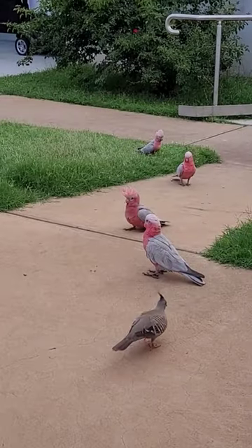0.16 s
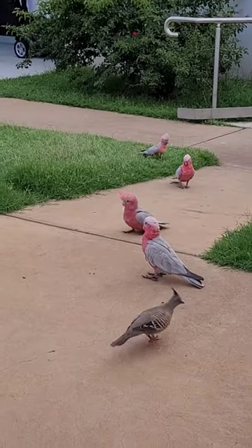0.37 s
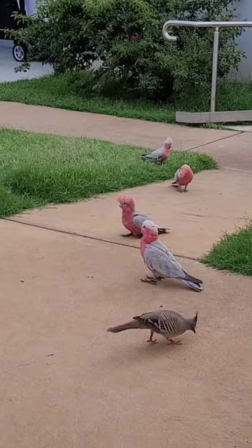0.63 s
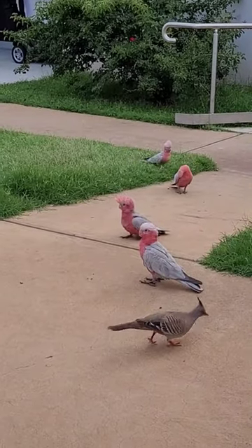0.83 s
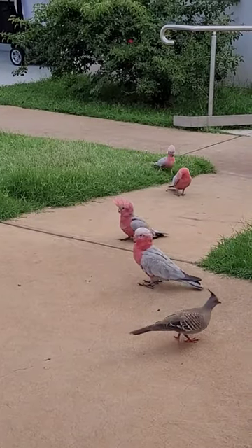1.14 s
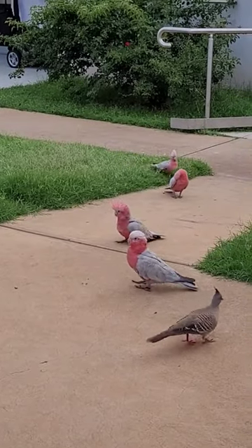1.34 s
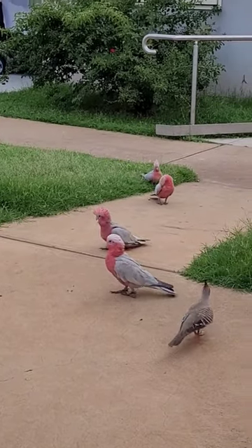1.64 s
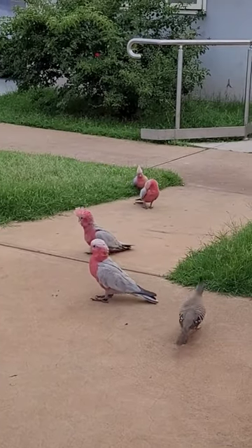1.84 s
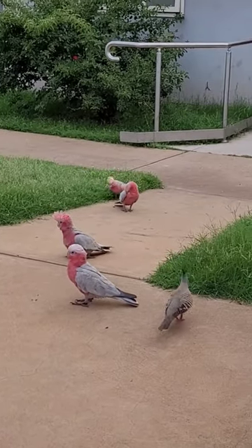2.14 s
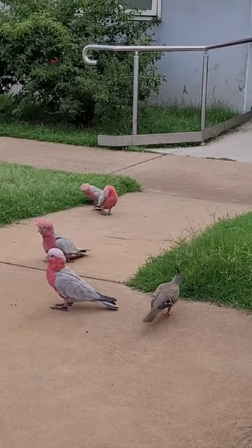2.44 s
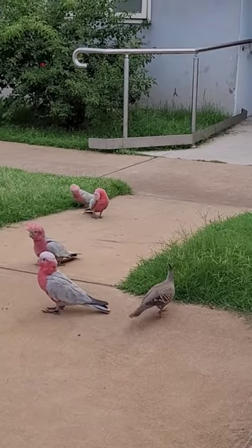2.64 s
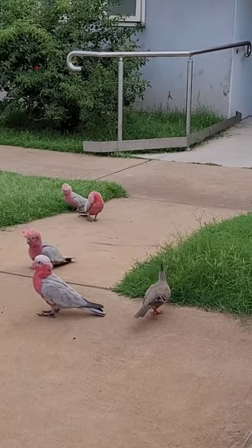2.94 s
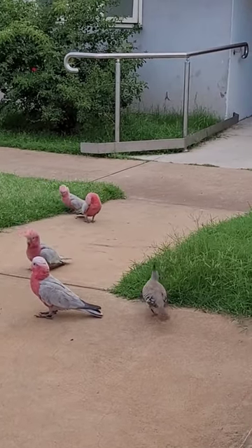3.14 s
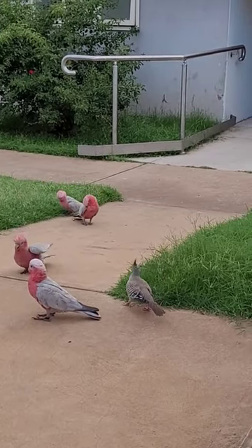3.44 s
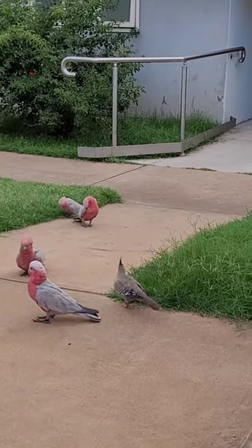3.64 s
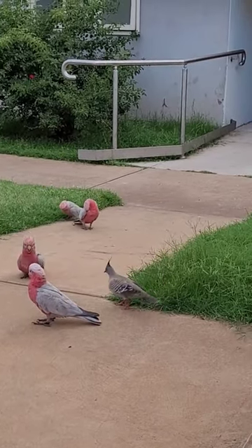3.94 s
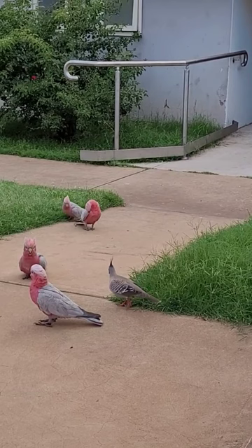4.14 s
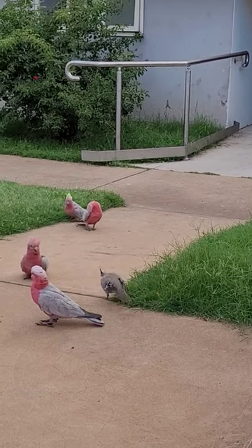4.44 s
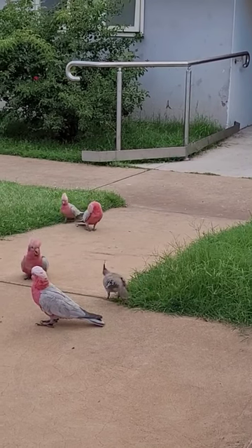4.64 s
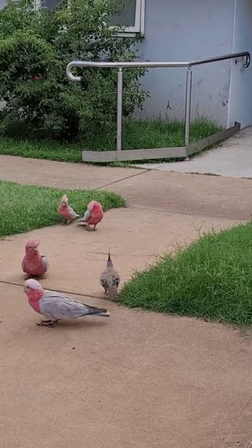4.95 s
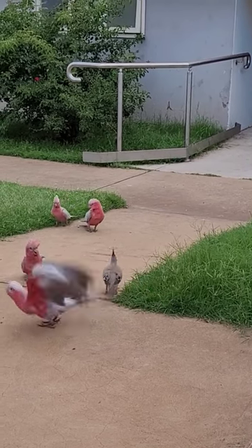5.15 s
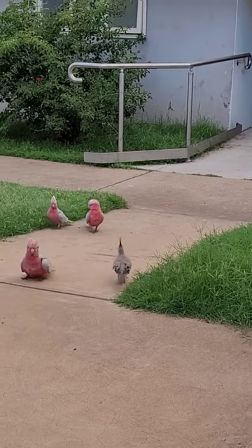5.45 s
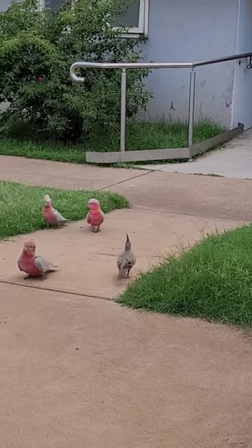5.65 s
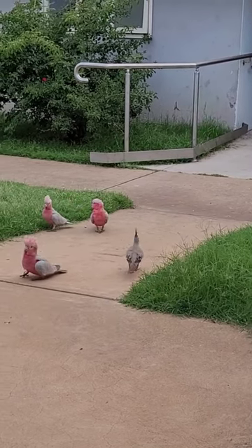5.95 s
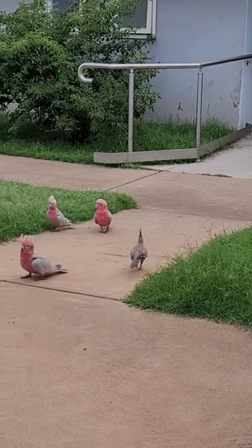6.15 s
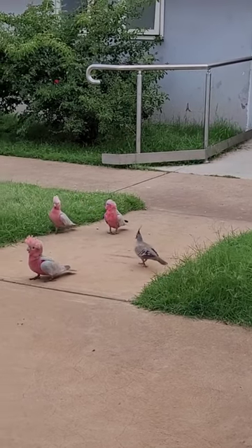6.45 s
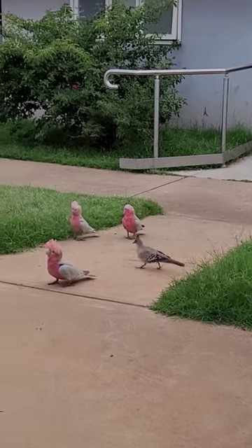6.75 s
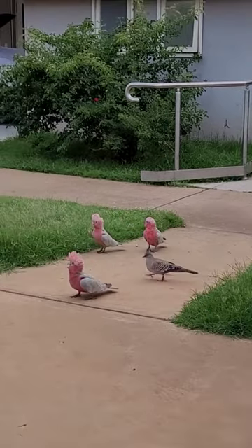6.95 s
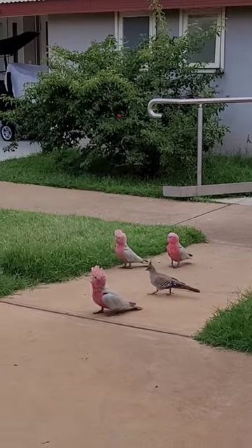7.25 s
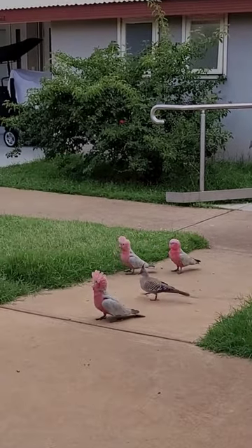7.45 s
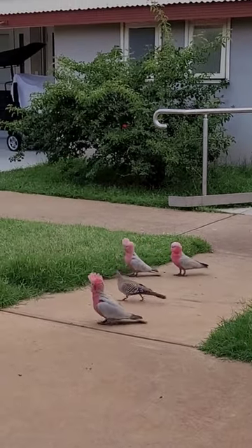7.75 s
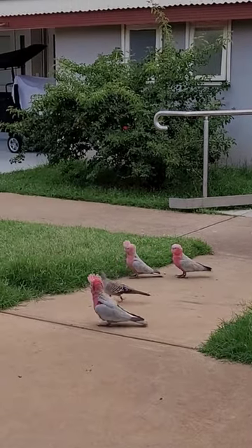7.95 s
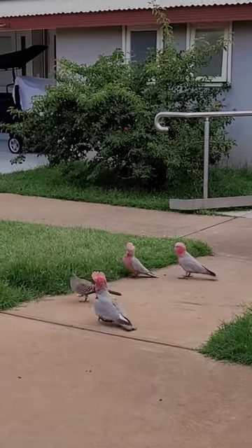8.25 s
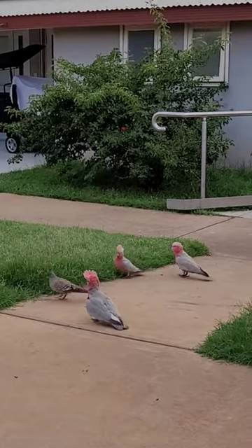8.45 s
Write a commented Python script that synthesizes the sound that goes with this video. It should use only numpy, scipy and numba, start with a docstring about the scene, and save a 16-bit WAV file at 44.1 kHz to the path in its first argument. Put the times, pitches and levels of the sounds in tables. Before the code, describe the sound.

A nearby cockatoo screeches in short high calls while others whistle and a young one wheezes and chatters, with light wind.

```python
"""A paved path between houses, with a flock of cockatoos a few metres away.
A near bird gives sharp "cheet" calls, whistles that a pulsing membrane breaks into a rasp. Others
whistle mostly falling notes; a young one wheezes, chatters and screeches through its throat resonances.
Paving and walls reflect the calls over distant traffic, a steady whine and a little wind on the
two microphone ports."""
import sys
import numpy as np
from scipy import signal
from scipy.fft import rfft, irfft
from scipy.io import wavfile
from scipy.ndimage import uniform_filter1d, minimum_filter1d
from numba import njit

SR = 44100
rng = np.random.default_rng(int(sys.argv[2]) if len(sys.argv) > 2 else 0)


def waveform_to_disk(signal):
    """Save audio, clipped to [-1, 1], as 16-bit WAV at the path in sys.argv[1]."""
    frames = np.transpose(np.atleast_2d(signal))
    scaled = np.clip(frames, -1, 1) * 32767
    samples = np.round(scaled).astype(np.int16)
    wavfile.write(sys.argv[1], SR, samples)


N = 379260
TIME = np.arange(N) / SR

# Near bird's calls: start_s, clean_s, rasping_s, first_hz, held_hz,
# whistle_db, octave_db, rasp_db, croak_db
CHEETS = [ (0.125, 0.021, .23, 3697, 3790, -27, -40.5, -19.5, -45.5),
          (0.863, 0.021, 0.13, 3444, 3712, -17.5, -25.5, -15.5, -28.5),
          (1.082, 0.033, 0.11, 3420, 3656, -19, -23, -17, -28.5),
          (1.31, 0.042, 0.11, 3533, 3670, -21, -24.5, -16.5, -29.5),
          (1.835, .02, 0.096, 3794, 3663, -28.5, -35.5, -41, -50.5),
          (2.36, 0.043, .10, 3424, 3665, -22, -23.5, -15, -29),
          (4.315, 0.021, .11, 3874, 3635, -27.5, -40, -31, -48),
          (5.185, 0.021, .12, 3444, 3690, -23.5, -28.5, -16.5, -28),
          (5.39, .05, .10, 3520, 3704, -22, -24, -18, -30.5),
          (5.692, .036, .11, 3467, 3669, -21, -24.5, -17.5, -30.5),
          (5.972, 0.045, 0.1, 3426, 3650, -21.5, -23, -18.5, -32),
          (7.69, 0.031, .11, 3326, 3650, -21.5, -23.5, -16.5, -27),
          (7.9, 0.041, .12, 3542, 3698, -21, -23.5, -16.5, -28)]
# Its throat resonances in the rasp and in the croak: centre_hz, width_hz, gain_db
RASP_FORMANTS = [(3090, 690, -9), (4455, 500, -1), (5510, 470, 3), (6520, 740, -13.5), (7960, 550, -14.5),
                 (10000, 830, -9)]
CROAK_FORMANTS = [(695, 600, -0.5), (1560, 83, -5), (2356, 350, 0.5), (2996, 130, 4.5)]


def cheets():
    """Subharmonic locking: a membrane at 1/5 of a whistle's frequency rasps over it, then croaks."""
    scoop_hz_per_s, sag_db_per_s, croak_s = 8900, 145, 0.0634
    out = np.zeros(N)
    for start, clean_s, rasping_s, first_hz, held_hz, db, octave_db, rasp_db, croak_db in CHEETS:
        span, t, gate = envelope(start, clean_s + rasping_s, attack_s=0.014, release_s=0.065)
        rasp_age = np.maximum(t - clean_s, 0)
        onset = np.clip(rasp_age / 0.0029, 0, 1)
        unsettled = np.exp(-(rasp_age / .025) ** 2)
        hz = held_hz + (first_hz - held_hz) * unsettled
        if first_hz < 3420:  # a low opening slides upward
            hz += scoop_hz_per_s * (np.minimum(t, clean_s) - clean_s / 2) * unsettled
        octave = octave_db - 13.5 * onset * np.exp(-(rasp_age / 0.042) ** 4)  # dips as the rasp begins
        upper_db = (db + octave) / 2
        whistle = harmonics(hz, [db, octave, upper_db - 11.5, upper_db - 21.5], hoarseness=0.153)
        # the rasp fades, catches just before the croak, then swells with it
        croak_progress = np.clip(1 + (rasp_age - rasping_s) / croak_s, 0, 1)
        catch_db = -7.5 * np.exp(-((rasp_age - rasping_s + croak_s) / 0.022) ** 2)
        swell_db = 6.5 * np.minimum(croak_progress / 0.45, 1)
        rasp_gain = undb(rasp_db - sag_db_per_s * rasp_age + catch_db + swell_db)
        rasp = onset * rasp_gain * voice(hz / 5, .1 * np.exp(-rasp_age / 0.088), RASP_FORMANTS)
        croak_hz = hz / 5 * (1 - .15 * croak_progress ** 2)
        croak_gain = np.clip(croak_progress / 0.54, .15, 1) * undb(croak_db)
        croak = onset * croak_gain * voice(croak_hz, 0.11, CROAK_FORMANTS)
        out[span] += gate * (whistle + rasp) + np.sqrt(gate) * croak
    return out


def harmonics(hz, levels_db, hoarseness):
    """Random modulation: tremor in frequency and amplitude broadens each line of a harmonic series."""
    count = len(hz)
    phase = 2 * np.pi * np.cumsum(hz * (1 + .007 * wander(150, count))) / SR
    lines = sum(undb(db + 2.5 * wander(89.6, count)) * np.sin(k * phase)
                for k, db in enumerate(levels_db, 1))
    return np.sqrt(2) * lines * (1 + hoarseness * wander(900, count))


def voice(hz, roughness, formants):
    """Source-filter model: membrane pulses and the breath they gate excite throat resonances."""
    count = len(hz)
    pulses = membrane_pulses(hz, np.full(count, roughness), rng.standard_normal((count // 20 + 2, 2)))
    breath = uniform_filter1d(pulses, size=24) * rng.standard_normal(count)
    source = unit_rms(pulses) + 0.73 * roughness * unit_rms(breath)
    rings = [undb(db) * resonance(source, centre, 2 * width, stages=2) for centre, width, db in formants]
    return unit_rms(sum((-1) ** k * ring for k, ring in enumerate(rings)))


@njit
def membrane_pulses(hz, roughness, scatter):
    """Jitter and shimmer: one pulse a cycle, with random scatter in its period and size."""
    pulses, phase, cycle = np.zeros(len(hz) + 1), 0., 0
    for i in range(len(hz)):
        step = hz[i] * np.exp(.5 * roughness[i] * scatter[cycle, 0]) / SR
        phase += step
        if phase >= 1:
            phase, cycle = phase - 1, cycle + 1
            size = np.exp(roughness[i] * scatter[cycle, 1])
            pulses[i] += size * phase / step
            pulses[i + 1] += size * (1 - phase / step)
    return pulses[:-1]


# Farther birds' notes: start_s, length_s, first_hz, last_hz, time_constant_s, level_db, octave_db
WHISTLES = [ (0.0, 0.055, 2348, 2290, 0.14, -35.5, -38.5), (0.055, 0.055, 2240, 2068, 0.13, -31.5, -35),
            (0.332, 0.096, 3000, 2922, 0.045, -35.5, -35), (0.747, .045, 2430, 2260, 0.021, -30, -34.5),
            (0.808, 0.053, 2365, 2395, .03, -31, -27), (0.868, 0.039, 3180, 2995, 0.04, -24, -23),
            (1.711, 0.047, 2785, 2490, 0.044, -42.5, -37.5), (1.919, 0.088, 2845, 2782, 0.13, -37, -33),
            (2.066, 0.14, 2426, 1860, 0.39, -42, -50), (2.326, 0.078, 2780, 2530, 0.041, -37, -26),
            (2.383, .135, 2686, 2282, 0.25, -39, -46), (3.531, .185, 2494, 1893, 0.34, -39, -42),
            (3.821, 0.1196, 2562, 2707, 0.033, -33.5, -22.5), (3.894, .1, 2650, 2350, .1, -36, -36),
            (4.408, 0.067, 2850, 2814, 0.088, -30.5, -30), (4.593, 0.046, 2997, 2645, 0.036, -32, -26),
            (4.665, 0.058, 2606, 2585, 0.028, -37.5, -34), (5.102, 0.061, 2080, 1844, .1, -57, -43.5),
            (5.169, 0.058, 2698, 2830, 0.0208, -29.5, -22), (5.2, .15, 2412, 2025, 0.198, -39, -32),
            (5.908, 0.12, 2990, 2703, 0.052, -41, -34.5), (6.299, 0.036, 2850, 2570, .03, -38.5, -33),
            (6.367, 0.064, 2380, 2476, 0.027, -48.5, -42.5), (6.75, 0.16, 2470, 1830, 0.24, -40, -43),
            (7.129, 0.13, 2535, 2263, 0.028, -38, -49), (7.76, 0.034, 2710, 2492, 0.033, -33.5, -24),
            (8.375, 0.042, 2325, 2185, 0.052, -56, -28.5), (8.439, 0.16, 2626, 1997, 0.014, -35, -64)]


def whistles():
    """Period doubling: gliding notes carry lines at odd multiples of half their frequency."""
    long_s = .132  # longer notes squawk, with stronger half-frequency lines
    out = np.zeros(N)
    for start, length, first_hz, last_hz, glide_s, db, octave_db in WHISTLES:
        span, t, gate = envelope(start, length, attack_s=0.24 * min(length, long_s), release_s=0.021)
        hz = first_hz + (last_hz - first_hz) * np.expm1(-t / glide_s) / np.expm1(-length / glide_s)
        half_db = -11.5 if length > long_s else -25.5
        levels_db = [db + half_db - 4.5, db, db + half_db, octave_db,
                     octave_db + half_db + 3.5, octave_db - 18, octave_db + half_db, octave_db - 24]
        out[span] += gate * harmonics(hz / 2, levels_db, hoarseness=0.29)
    return out


# Young bird's throat resonances: centre_hz, width_hz, gain_db
YOUNG_FORMANTS = [(648, 280, -18), (1900, 700, -11), (3436, 1160, -1), (4730, 750, 2), (5340, 1110, 2),
                  (10430, 3500, -10), (14300, 730, -19)]


def young_bird():
    """Aperiodic vibration: one hoarse voice feeds wheezes and chatter; a screech joins them."""
    hoarse = voice(np.full(N, 680.), roughness=.5, formants=YOUNG_FORMANTS)
    return wheezes(hoarse) + chatter(hoarse) + screech()


# Begging breaths: start_s, length_s, first_db, last_db, windpipe_hz, windpipe_db
WHEEZES = [ (0.0, .4, -35, -35.5, 1420, -55), (0.361, 0.58, -47.5, -30.5, 1477, -48.5),
           (1.498, 0.52, -54, -37.5, 1340, -55), (2.003, 0.39, -39.5, -46, 1474, -54.5),
           (3.548, 1.16, -41, -42, 1381, -46.5), (4.679, 0.545, -45.5, -37.5, 1457, -52.5),
           (6.202, 0.77, -62, -37, 1490, -61.5), (7.116, 0.49, -28.5, -28.5, 1364, -45),
           (7.561, 0.24, -43, -36, 1480, -52), (8.223, .44, -49.5, -36.5, 1450, -58.5)]
# Mouth resonances, breathing in and out: centre_hz, width_hz, gain_db
MOUTH_IN = [(3900, 500, 4), (5170, 600, 2.3)]
MOUTH_OUT = [(4230, 770, 2.9), (5910, 960, 0.48)]


def wheezes(hoarse):
    """Cavity resonance: the mouth colours the hoarse voice while breath noise rings the windpipe."""
    out = np.zeros(N)
    for start, length, first_db, last_db, pipe_hz, pipe_db in WHEEZES:
        span, t, gate = envelope(start, length, attack_s=0.052, release_s=0.079)
        ring_hz = pipe_hz * (1 + 0.029 * wander(6.5, len(t)))
        pipe = resonance(rng.standard_normal(len(t)), ring_hz, width_hz=100, stages=2)
        mouth = MOUTH_IN if pipe_hz > 1400 else MOUTH_OUT  # the windpipe rings higher breathing in
        rings = sum(undb(db) * resonance(hoarse[span], hz, width) for hz, width, db in mouth)
        throb = undb(first_db + (last_db - first_db) * t / length + 1.3 * wander(35, len(t)))
        pipe_gain = undb(pipe_db + 5 * wander(18, len(t)))
        out[span] += gate * (throb * unit_rms(hoarse[span] + rings) + pipe_gain * pipe)
    return out


# Chatter bursts: start_s, level_db, length_s
CHATTER = [(1.556, -44.5, 0.032), (1.647, -40, 0.021), (1.6874, -40.5, 0.032), (1.792, -37.5, 0.025),
           (1.831, -35.5, 0.025), (1.871, -32, 0.028), (3.459, -48, 0.019), (3.569, -34, 0.038),
           (3.644, -30.5, 0.041), (3.733, -26, 0.011), (3.785, -27.5, 0.026), (3.8547, -32, 0.09),
           (3.969, -29, 0.038), (4.056, -26, 0.019), (4.089, -26, 0.016), (4.139, -27, 0.029),
           (4.186, -28, 0.01), (4.214, -29.5, 0.019), (4.244, -27, 0.039), (4.313, -28, 0.023),
           (4.357, -28, 0.05), (4.453, -30, 0.047), (4.5024, -25, 0.015), (4.54, -24.5, 0.014),
           (4.598, -21.5, 0.0083), (4.628, -25, 0.017), (4.65, -29, 0.017)]


def chatter(hoarse):
    """Amplitude gating: short envelopes chop the hoarse voice into bursts."""
    attack_s = 0.0075
    out = np.zeros(N)
    for start, db, length in CHATTER:
        t = np.arange(int(1.45 * length * SR)) / SR
        span = slice(int(start * SR), int(start * SR) + len(t))
        gate = np.minimum(t / attack_s, 1) * np.exp(-(t / length) ** 4)
        out[span] += undb(db) * gate * hoarse[span]
    return out


# Contour of the screech: time_s, pitch_hz, level_db
SCREECH = [(6.85, 555.5, -28.5), (6.884, 618, -29.5), (6.918, 633, -23), (6.984, 659.5, -20.5),
           (7.012, 600.6, -23.5), (7.142, 576.5, -24.5), (7.16, 577.1, -30)]
# Throat resonances in the screech: centre_hz, width_hz, gain_db
SCREECH_FORMANTS = [(646, 600, -13.5), (3045, 350, 2.5), (4390, 1050, 10), (6060, 480, 7),
                    (6900, 2200, -0.5), (10200, 5800, -7.5)]


def screech():
    """Voicing: nearly periodic membrane pulses give one cry a definite pitch."""
    times, hz, db = np.transpose(SCREECH)
    span, t, gate = envelope(times[0], times[-1] - times[0], attack_s=0.013, release_s=0.034)
    cry = voice(np.interp(t + times[0], times, hz), roughness=.028, formants=SCREECH_FORMANTS)
    out = np.zeros(N)
    out[span] = gate * undb(np.interp(t + times[0], times, db)) * cry
    return out


def early_paths(x, lag_s, bounce_s, bounce_db):
    """Superposition: direct sound, later at the left port, adds to paving and wall reflections."""
    def delayed(seconds):
        return np.pad(x, (int(seconds * SR), 0))[:N]
    wall = undb(-5) * np.array([delayed(wall_s + bounce_s) for wall_s in (.013, .019)])
    left = delayed(lag_s) + undb(bounce_db) * delayed(lag_s + bounce_s)
    right = x + undb(bounce_db) * delayed(1.3 * bounce_s)
    return wall + np.array([left, right])


@njit
def reverberation(x, lags, gain, damping):
    """Multiple reflection between walls: eight coupled delay lines lose treble on every round."""
    lines, dulled, out = np.zeros((8, 8192)), np.zeros(8), np.zeros((2, len(x)))
    for i in range(len(x)):
        for k in range(8):
            dulled[k] += (1 - damping) * (gain[k] * lines[k, (i - lags[k]) & 8191] - dulled[k])
            out[k % 2, i] += dulled[k]
        coupling = dulled.sum() / 4
        for k in range(8):
            lines[k, i & 8191] = x[i] + dulled[k] - coupling
    return out


# Spectrum of distant traffic: frequency_hz, level_db
TRAFFIC_SPECTRUM = [(15, -37), (25, -27), (62, -10.5), (176, -11.5), (207, -5.5), (293, -6.5), (856, -18),
                    (927, -24), (1060, -3), (1240, -21), (1700, -27), (2500, -26), (15000, -51)]


def traffic():
    """Spatial coherence: slowly swelling noise is most alike at the two ports in the bass."""
    mid, side = (equalise(rng.standard_normal(N), TRAFFIC_SPECTRUM) for _ in range(2))
    side = equalise(side, [(300, -12), (700, -3.5), (3000, 2)])
    return unit_rms(np.array([mid + side, mid - side])) * undb(-54.5 + 1.5 * wander(2.5))


def whine():
    """Narrow-band noise: a sharp resonance is heard as a wavering tone, louder on the right."""
    tone = resonance(rng.standard_normal(N), centre_hz=1058, width_hz=8.2)
    return undb(-59) * tone * undb([[-1.5], [1.5]])


# Gusts on the ports: peak_s, level_db, half_width_s
GUSTS = [(0.2, -61, 0.73), (1.0, -55.5, 0.33), (1.41, -48, 0.05), (3.9, -61.5, .4), (4.98, -58, 0.2),
         (5.3, -59, 0.097), (5.5, -54.5, .05), (5.769, -53, 0.06), (6.03, -60, 0.051), (7.78, -52, 0.055),
         (8.0, -57, .1), (8.6, -74, .15)]


def wind():
    """Turbulent pressure: a gusty rumble, partly coherent between the ports, stronger on the left."""
    spectrum = [(20, -38.5), (50, -8.5), (90, -18.5), (250, -17), (600, -52.5)]  # frequency_hz, level_db
    gusts = sum(undb(db) * np.exp(-((TIME - peak) / width) ** 2) for peak, db, width in GUSTS)
    mid, side = (unit_rms(equalise(rng.standard_normal(N), spectrum)) for _ in range(2))
    rumble = np.array([mid + 0.44 * side, mid - 0.44 * side])
    flutter = undb(2.5 * wander(9))
    return rumble * (undb(-75) + gusts) * flutter * undb([[2.5], [-3.5]])


def undb(db):
    """Amplitude ratio of a level in decibels."""
    return 10 ** (np.asarray(db) / 20)


def unit_rms(x):
    """Normalisation to unit mean power."""
    return x / np.sqrt(np.mean(x ** 2))


def wander(rate_hz, count=N):
    """Low-pass noise: random steps, smoothed twice, with a spread near 1."""
    hold = int(SR / rate_hz)
    steps = np.repeat(rng.standard_normal(count // hold + 1), hold)
    return 1.587 * uniform_filter1d(uniform_filter1d(steps, hold), hold)[:count]


def envelope(start, length, attack_s, release_s):
    """Attack, hold and release: a call's span, local time and gain; one at 0 s is already under way."""
    span = slice(int(start * SR), min(int((start + length) * SR), N))
    t = TIME[span] - start
    rise = t / attack_s if start > 0 else np.inf
    ramp = np.clip(np.minimum(rise, (length - t) / release_s), 0, 1)
    return span, t, np.sin(np.pi / 2 * ramp) ** 2


def equalise(x, curve, power=1):
    """Spectral weighting by a (frequency_hz, gain_db) curve raised to a power."""
    hz, db = np.transpose(curve)
    bins_hz = np.maximum(np.fft.rfftfreq(N, 1 / SR), 1)
    return irfft(rfft(x) * undb(power * np.interp(np.log(bins_hz), np.log(hz), db)), N)


def resonance(x, centre_hz, width_hz, stages=1):
    """Resonators in cascade: each stage steepens the skirts; the result has rms 1."""
    for _ in range(stages):
        x = band_pass(x, centre_hz + np.zeros(len(x)), float(width_hz))
    return unit_rms(x)


@njit
def band_pass(x, hz, width_hz):
    """Second-order state-variable resonator with unit gain at its moving centre."""
    out, band, low = np.empty(len(x)), 0., 0.
    for i in range(len(x)):
        g, damping = np.tan(np.pi * hz[i] / SR), width_hz / hz[i]
        v = (band + g * (x[i] - low)) / (1 + g * (g + damping))
        band, low = 2 * v - band, low + 2 * g * v
        out[i] = damping * v
    return out


# Level difference between the ports: frequency_hz, left_minus_right_db
PORT_BALANCE = [(60, -14), (110, 0.5), (200, -6), (380, 1), (700, 2.5), (1290, -0.5), (2380, 1),
                (4400, -9.5), (8120, -9), (15000, 12.5)]


def scene():
    """Linear mixing: direct and reflected calls, coloured by each port, add to the background."""
    near, far, young = cheets(), whistles(), young_bird()
    early = (early_paths(near, lag_s=.00015, bounce_s=.003, bounce_db=-0.84)
             + early_paths(far, lag_s=.0003, bounce_s=.005, bounce_db=-1.8)
             + early_paths(young, lag_s=.00035, bounce_s=.002, bounce_db=-2.5))
    lags, t60_s = rng.integers(700, 4000, 8), 0.72
    round_gain = undb(-60 * lags / SR / t60_s)
    tail = reverberation(near + undb(3) * far + young + 1e-18, lags, round_gain, damping=0.31)
    left, right = undb(2) * early + undb(-13) * tail
    birds = np.array([equalise(left, PORT_BALANCE, 0.54), equalise(right, PORT_BALANCE, -0.52)])
    return birds + traffic() + whine() + wind()


def record(dry):
    """Peak and band limiting: the gain ducks at peaks over a ceiling, and a low-pass cuts the top."""
    ceiling, window, cutoff_hz = .92, int(.004 * SR), 15800
    gain = np.minimum(1, ceiling / np.maximum(np.abs(dry).max(axis=0), 1e-9))
    gain = uniform_filter1d(minimum_filter1d(gain, size=window), size=window)
    return signal.sosfilt(signal.ellip(10, .2, 80, cutoff_hz, fs=SR, output="sos"), gain * dry)


dry = scene()
out = record(dry)
waveform_to_disk(out)
```